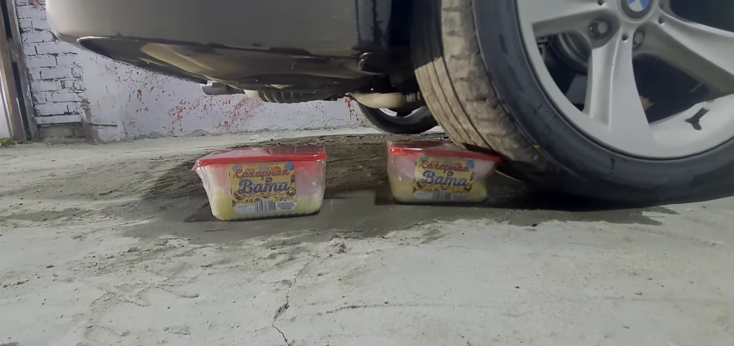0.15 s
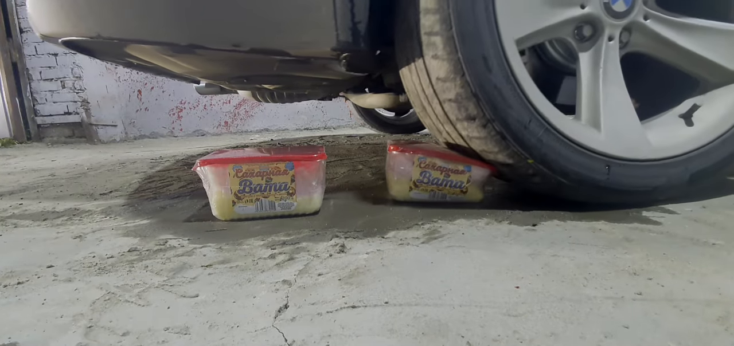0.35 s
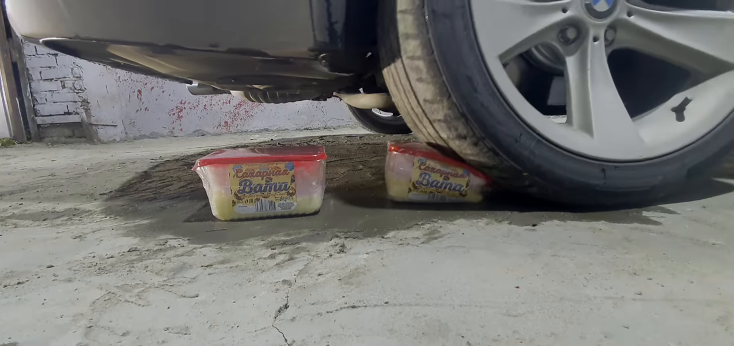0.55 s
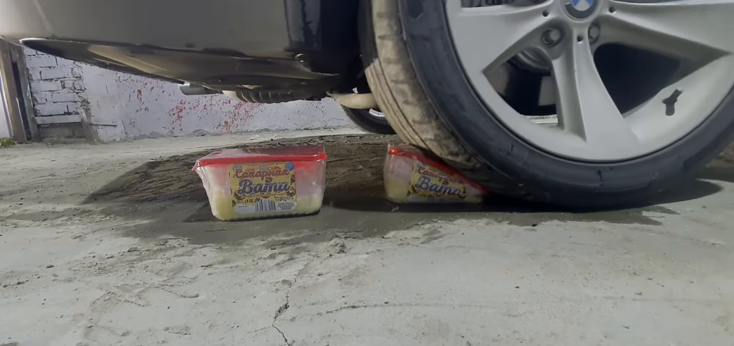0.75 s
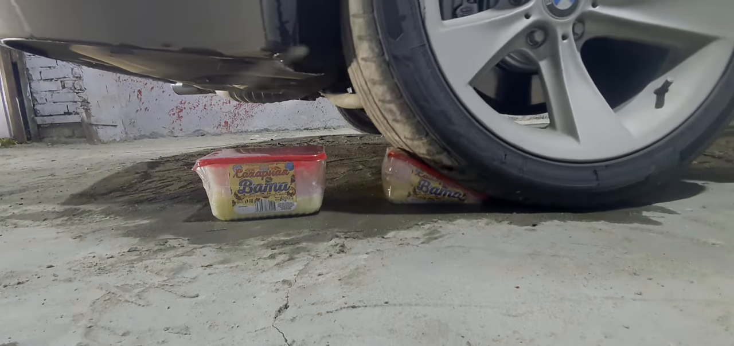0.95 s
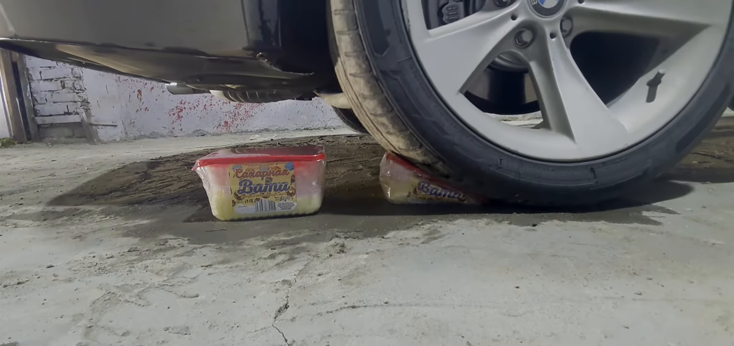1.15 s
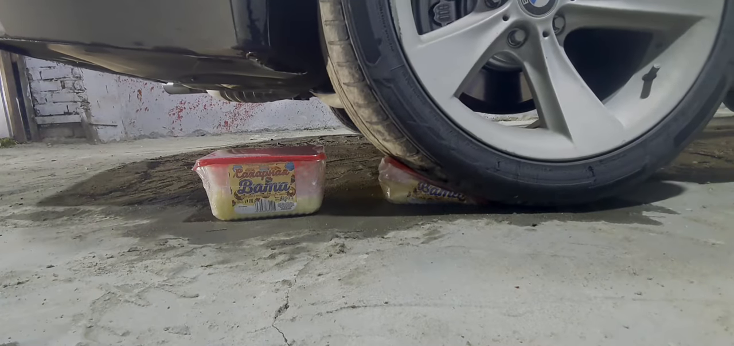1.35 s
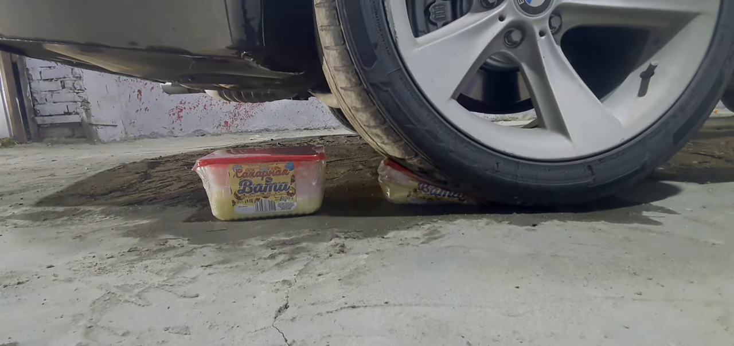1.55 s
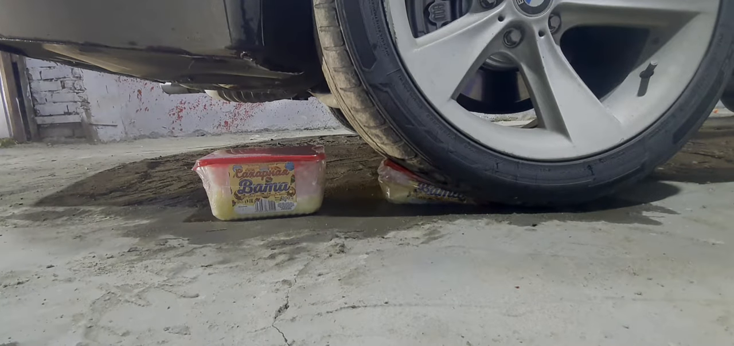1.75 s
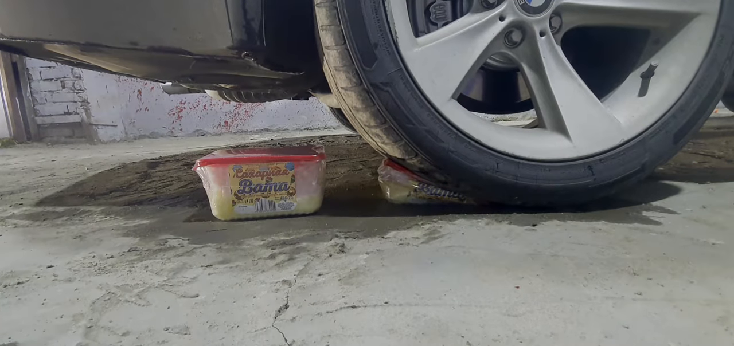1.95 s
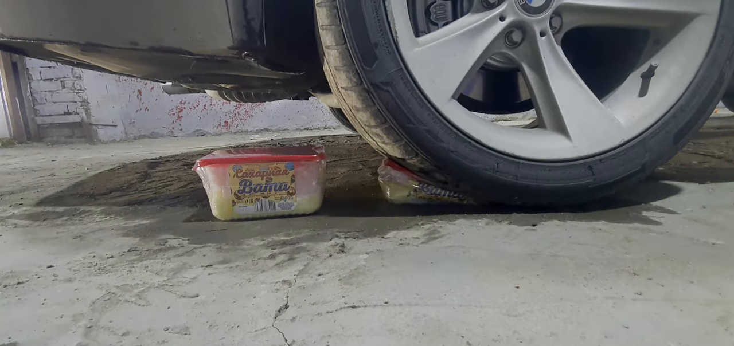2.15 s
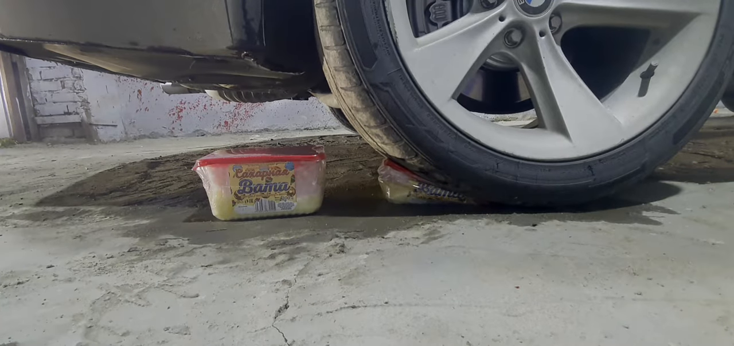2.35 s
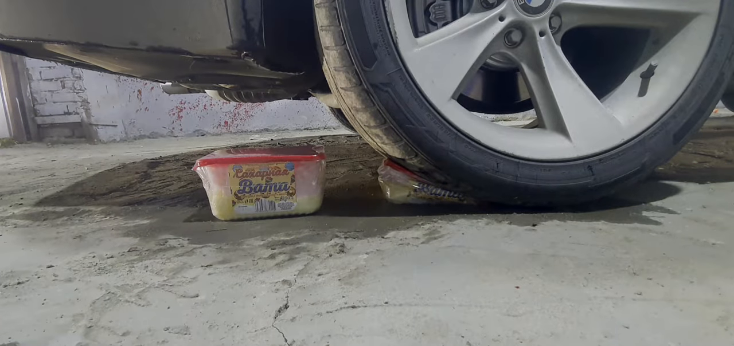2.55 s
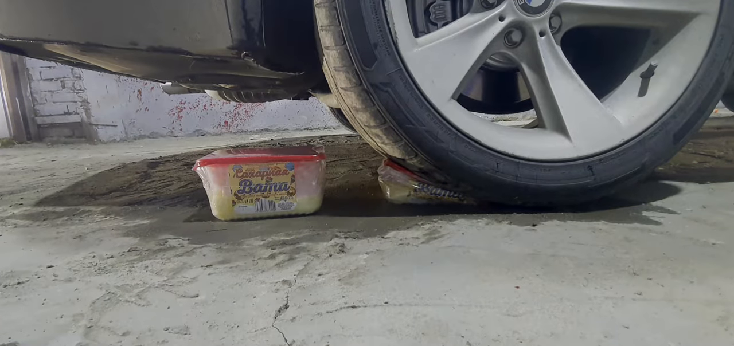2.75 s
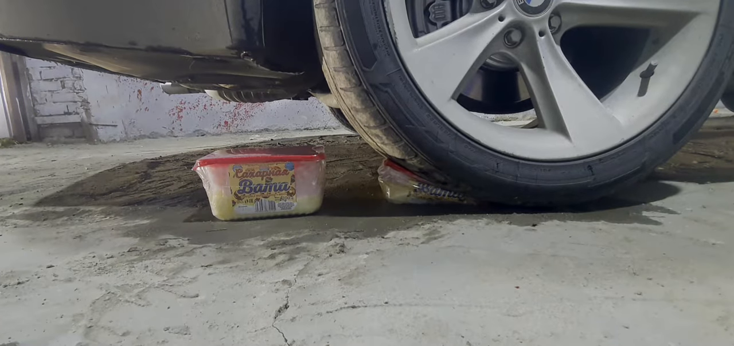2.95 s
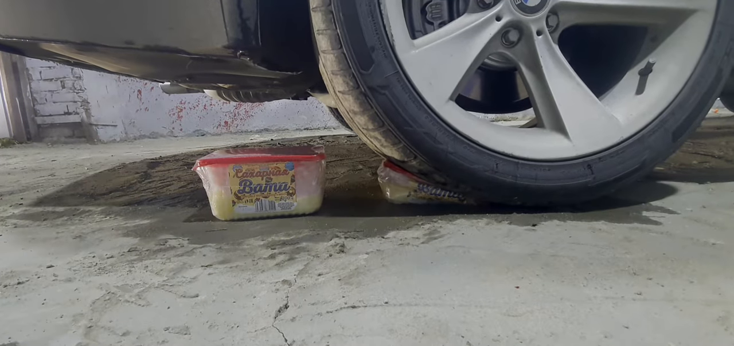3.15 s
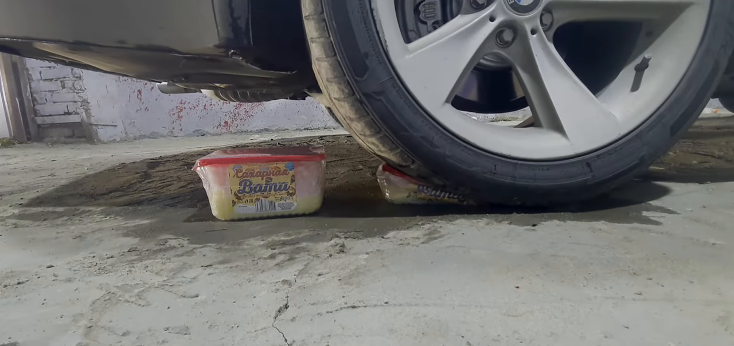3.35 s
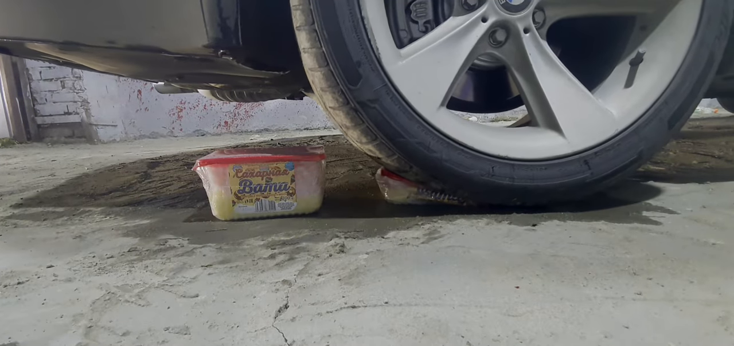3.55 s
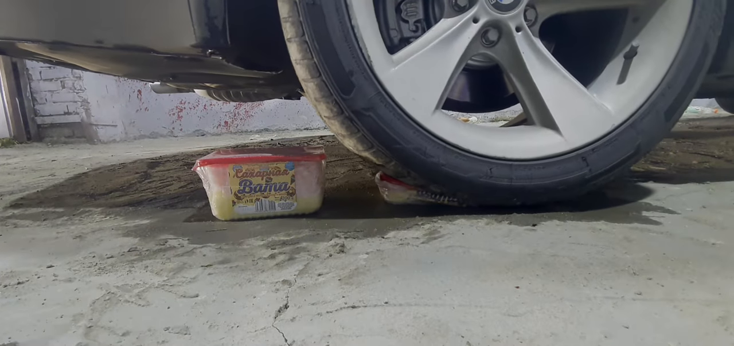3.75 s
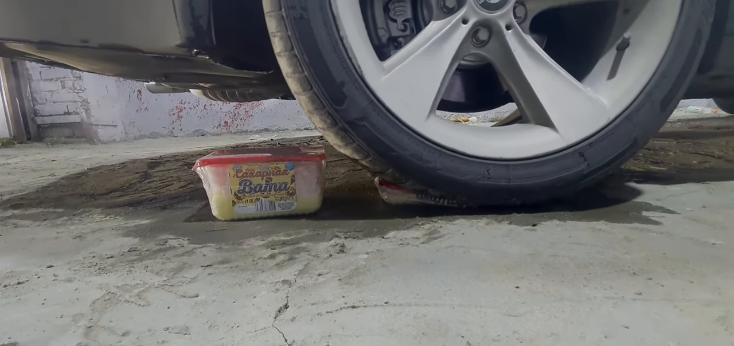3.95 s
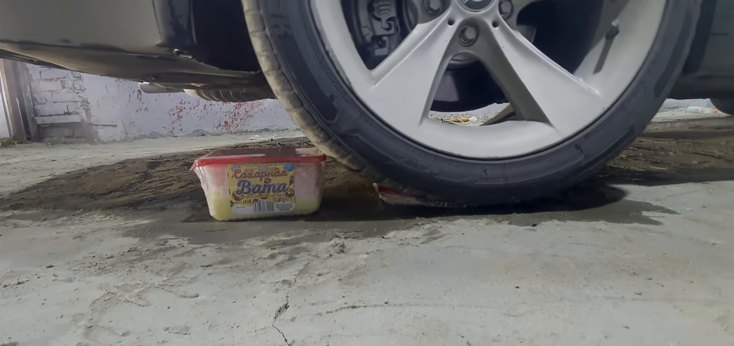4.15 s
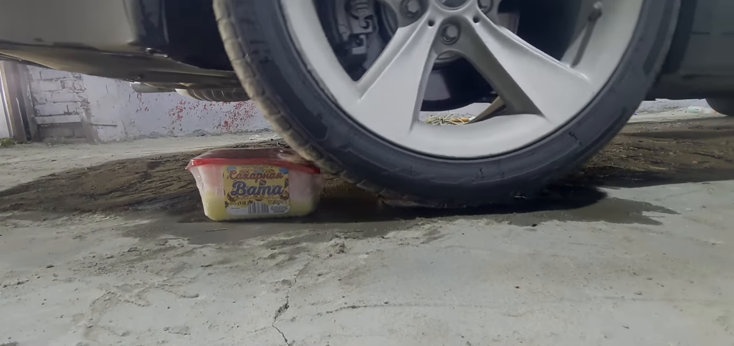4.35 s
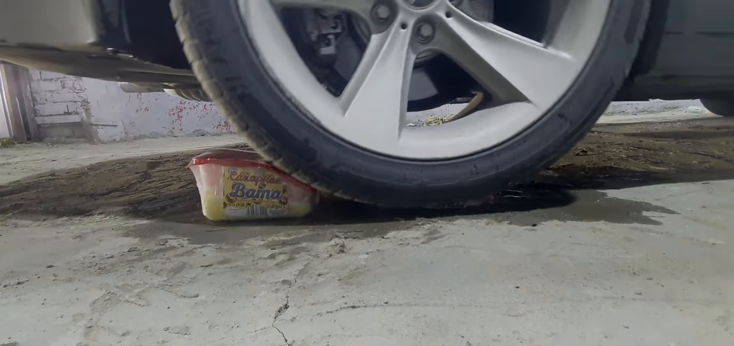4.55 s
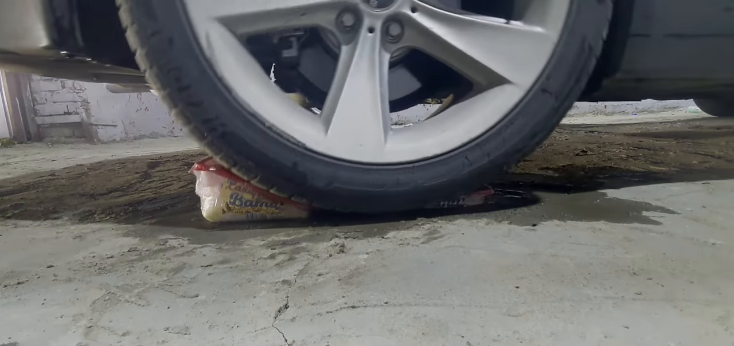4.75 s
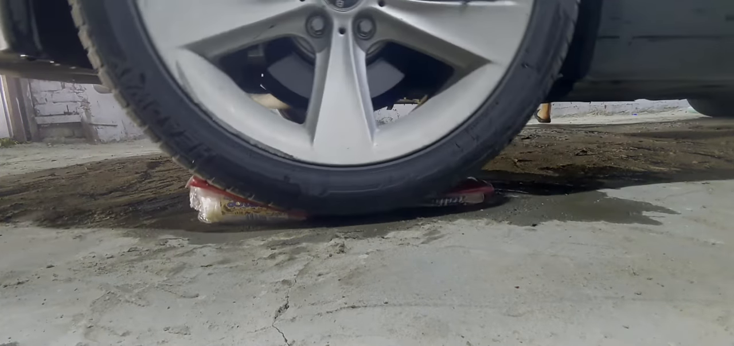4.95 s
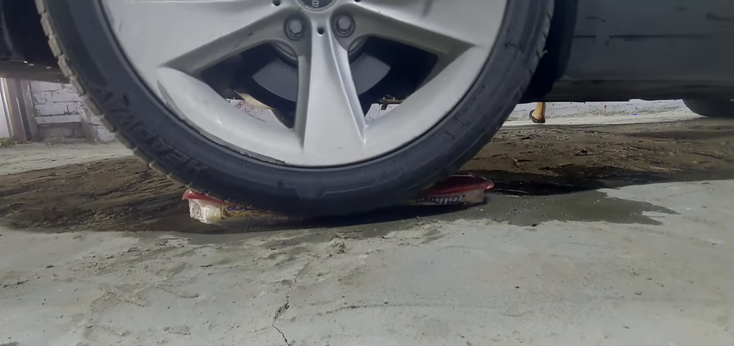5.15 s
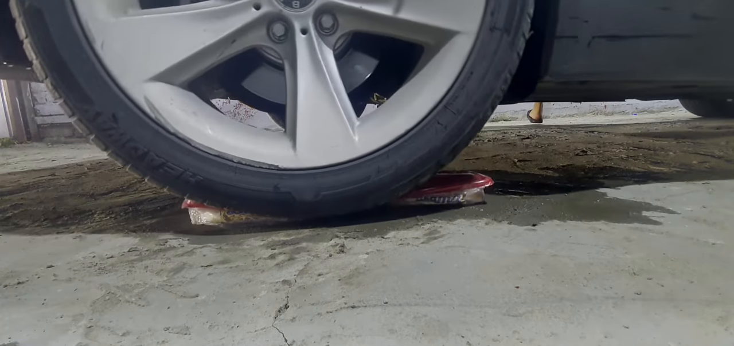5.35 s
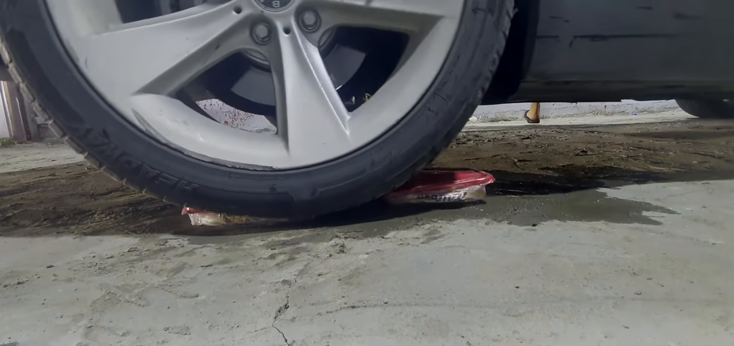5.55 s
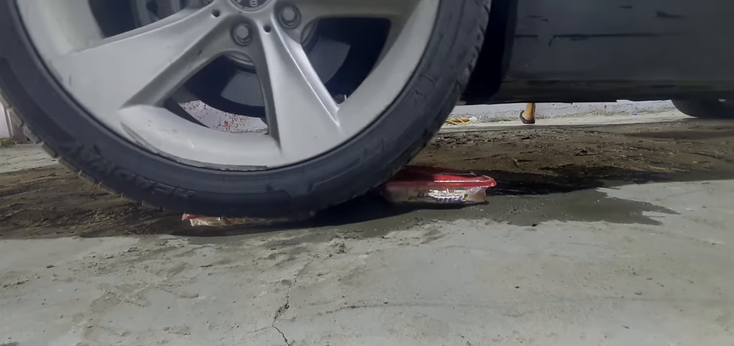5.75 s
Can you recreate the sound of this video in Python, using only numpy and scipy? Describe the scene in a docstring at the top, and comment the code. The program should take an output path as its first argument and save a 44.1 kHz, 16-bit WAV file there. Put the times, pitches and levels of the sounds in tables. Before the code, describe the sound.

A low, throbbing four-cylinder idle runs throughout. Over it, thin plastic buckles at once in hollow pops, snaps and fine crackle, then goes almost quiet as the wheel stalls. The engine picks up slightly with a booming hum, crackling resumes, and a second tub collapses loudly, leaning left, before small ticks trail off. Near, dry and detailed, with short reflections from the car's underside and hard walls.

```python
"""A concrete floor with walls around: a car creeps over two thin plastic tubs, engine just above idle.
The tub walls give dry pops (short damped tones) and cracks (noise bursts) over a fine crackle of tiny grains.
Grit crunches under the tread as bursts of noise, and the crushed plastic gets a short echo.
The four-cylinder engine is a set of tones tied to the crankshaft, plus throbbing noise; it speeds up
briefly to climb the first tub."""
import sys
import numpy as np
from scipy import signal
from scipy.fft import rfft, irfft, next_fast_len
from scipy.io import wavfile
from scipy.ndimage import map_coordinates

SR = 44100
rng = np.random.default_rng(int(sys.argv[2]) if len(sys.argv) > 2 else 0)


def waveform_to_disk(signal):
    """Save audio, clipped to [-1, 1], as 16-bit WAV at the path in sys.argv[1]."""
    frames = np.transpose(np.atleast_2d(signal))
    scaled = np.clip(frames, -1, 1) * 32767
    samples = np.round(scaled).astype(np.int16)
    wavfile.write(sys.argv[1], SR, samples)


N = 255780

# tub walls buckling: t/s, pop level/dB, pop f/Hz, pop decay/cycles, crack level/dB
# (levels here and in the ticks are set before colouring and left-right balance)
BUCKLES = [(0.0396, -2, 670, 0.28, -21.5), (0.065, -5.5, 640, 0.16, -20), (0.0918, -4.5, 630, 0.25, -21),
           (0.0953, -2, 1120, 0.37, -18), (0.1603, -6.5, 1200, .11, -12.5), (0.231, -18.5, 474, .16, -36),
           (0.2792, -10, 880, 0.094, -24), (0.307, -16, 550, 0.2, -23), (0.4062, -14, 1430, .09, -33),
           (0.4734, -13, 570, 0.11, -38), (0.4979, -17.5, 1260, 0.38, -42), (0.554, -13.5, 1710, .34, -35),
           (0.5582, -5, 1900, .18, -16.5), (0.6103, -20, 1920, .15, -11), (0.6249, -7.5, 1470, .21, -11),
           (0.6668, -13, 1470, .16, -14), (0.682, -7, 1690, 0.14, -17), (0.7293, -8.5, 940, 0.24, -34),
           (0.7526, -10, 960, .31, -31), (0.757, -13, 726, 0.49, -24), (0.8322, -15.5, 1850, .3, -20),
           (0.8473, -14, 2020, .46, -18.5), (0.976, -18, 1700, .44, -41), (1.0083, -8, 1610, 0.15, -38),
           (1.0391, -10.5, 1740, .16, -34), (1.0511, -16, 774, 0.44, -33), (1.0872, -17, 1700, 0.15, -43),
           (1.135, -14, 1580, .1, -29), (1.1401, -13, 1800, .1, -27), (1.195, -17.5, 1530, 0.17, -22.5),
           (1.3056, -14, 1710, 0.22, -15), (1.398, -5, 2400, .4, -13.5), (3.2439, -9.5, 1980, .17, -23),
           (3.295, -9.5, 2010, 0.2, -14), (3.3624, -15.5, 1470, .26, -26), (3.5654, -15.5, 1460, .31, -46),
           (3.6388, -10, 1870, 0.2, -14), (4.1626, -10, 750, .11, -21), (4.1873, -7, 1020, 0.31, -14.5),
           (4.2331, -5, 840, .22, -25), (4.2458, -7, 850, 0.16, -20), (4.262, -3, 770, .24, -22),
           (4.2836, -7.5, 1710, .19, -19), (4.3043, -5.5, 830, .13, -12), (4.3151, -13.5, 607, .19, -30),
           (4.3757, -12.5, 970, 0.4, -19), (4.4763, -15.5, 800, 0.24, -26), (4.5042, -10, 497, 0.32, -23),
           (4.5397, -8, 560, 0.26, -25), (4.5824, -15, 766, .4, -31), (4.5956, -4, 810, 0.31, -21),
           (4.6282, -10, 1400, .09, -14.5), (4.6471, -10, 2770, 0.34, -28), (4.6634, -11.5, 1370, .14, -18),
           (4.6807, -10, 820, .24, -23), (4.6899, -10, 725, .31, -20), (4.6986, -12, 1520, .19, -13),
           (4.705, -8.5, 705, .41, -28), (4.741, -11, 1000, 0.24, -30), (4.7511, -16, 1510, .24, -13),
           (4.7755, -15, 970, 0.21, -13.5), (4.8386, -12, 910, 0.31, -31), (4.8798, -14.5, 2240, .11, -24),
           (4.9287, -19, 1340, 0.22, -28), (5.0127, -16, 1820, .27, -46), (5.243, -23, 2250, .1, -29),
           (5.3328, -14.5, 2400, 0.2, -24), (5.5317, -21, 1610, .18, -33), (5.6714, -13.5, 1920, 0.29, -26)]
# plastic splitting without buckling, a high tick: t/s, level/dB, thinness (0-1)
SPLIT_TICKS = [(0.1834, -14.5, .2), (0.2008, -13.5, .3), (0.364, -16.5, .25), (1.171, -15, .55),
               (1.2473, -18.5, .2), (1.507, -22, .15), (1.638, -25.5, .55), (2.3343, -24, .4),
               (3.143, -22.5, .35), (3.23, -20.5, .5), (3.6136, -28, .7), (3.8392, -18, 0),
               (4.058, -21.5, .8), (5.0319, -15.5, .4), (5.0658, -16.5, .05), (5.1302, -19.5, .1),
               (5.358, -19, .9), (5.3913, -22.5, .7)]
# colour of the cracks: f/Hz, level/dB
CRACK_COLOUR = [(2000, -19), (4000, 3), (6000, -0.5), (7800, -3.5), (11000, -1.5), (15500, -6.5),
                (17000, -40)]
# the snaps move towards the left: t/s, left minus right level/dB
SNAP_BALANCE = [(1, -0.7), (4.3, 1), (5.1, 7), (5.6, 0.5)]


def snaps():
    """A buckling wall gives one short pop; where the plastic splits, a sharp crack rides on it or ticks alone."""
    pops, cracks = np.zeros((2, 2, N + SR))
    for s, level_db, thin in SPLIT_TICKS:
        add(cracks, s, amp(level_db) * crack(np.clip(thin, 0, 1)))
    for s, pop_db, hz, life, crack_db in BUCKLES + stray_snaps(count=150):
        add(pops, s, amp(pop_db) * pop(s, hz, life, overtone_db=-5))
        # the less the wall moves, the thinner the crack
        thin = np.clip((crack_db - pop_db + 4.5) / 30, -.25, .9)
        add(cracks, s + 0.00022, amp(crack_db) * crack(thin))

    no_bass = signal.butter(2, 200, 'hp', fs=SR, output='sos')
    pops = signal.sosfilt(no_bass, pops[:, :N])
    cracks = filtered(cracks[:, :N], lambda hz: amp(along(CRACK_COLOUR, hz)))
    sides = np.array([[.5], [-.5]])  # half of each left-right difference to either channel
    cracks = amp(3 + sides * 2.5) * cracks
    balance_db, = curves(SNAP_BALANCE)
    return (pops + cracks) * amp(sides * balance_db)


# which side hears a pop first, tub on the right and then tub on the left: t/s, head start of the left/s
LEFT_LEAD = [(3.7, -.00009), (4.1, .00013)]


def pop(s, hz, life, overtone_db):
    """A patch of wall flips over at time s: a few heavily damped cycles that reach one side first."""
    t = np.arange(SR // 80) / SR
    lead = np.interp(s, *np.transpose(LEFT_LEAD)) + rng.normal(0, .00007)
    cycles = hz * np.maximum(t + np.array([[.5], [-.5]]) * lead, 0)

    def swell(span):
        """Rise quickly and die away, both counted in cycles."""
        return (cycles / span) ** 2 * np.exp(-cycles / span)

    main = swell(life) * np.sin(2 * np.pi * cycles + rng.normal(0, 0.56))
    # a second, higher way for the wall to bend, weaker in high pops
    higher = swell(0.79 * life) * np.sin(2 * np.pi * cycles * rng.uniform(1.82, 3.08))
    higher = amp(overtone_db) / (1 + hz / 1500) * higher
    return burst(main + higher) * rng.choice([-1, 1])


def crack(thin):
    """The plastic splits: a sharp burst of noise; the thinner it is, the more it is all treble."""
    t = np.arange(SR // 80) / SR
    onset = 1 - np.exp(-t / .00005)
    decay = np.exp(-t / 0.00013) + 0.15 * np.exp(-t / 0.0013)
    noise = rng.standard_normal((2, len(t)))
    noise = signal.lfilter([1, -2 * thin, thin ** 2], [1, 0, 0.17 * thin], noise)
    return amp(5.4 * thin) * burst(decay * onset * noise)


STRAY_POP_DB, STRAY_CRACK_DB = 15, 9.5  # the largest strays, above the crumpling level
STRAY_RANGE_DB = 13  # the smallest lie this far below the largest
STRAY_TOP_DB = -33  # harder crumpling makes them no louder
STRAY_CYCLES = 0.18  # decay of their pops


def stray_snaps(count):
    """Small snaps at random moments, closer together where the crumpling is hard, as rows like those of BUCKLES."""
    level_db = crumple_level()
    share = np.cumsum(amp(.5 * level_db))
    rows = []
    for when, pop_size, pitch, crack_size in rng.random((count, 4)):
        i = np.searchsorted(share, when * share[-1])
        db = min(level_db[i], STRAY_TOP_DB)
        pop_db = db + STRAY_POP_DB - STRAY_RANGE_DB * pop_size
        crack_db = db + STRAY_CRACK_DB - STRAY_RANGE_DB * crack_size
        rows.append((i / SR, pop_db, 850 * 4.8 ** pitch, STRAY_CYCLES, crack_db))
    return rows


# colour of the crackle of creasing plastic: f/Hz, level/dB
CREASE_COLOUR = [(150, -47), (350, -8), (750, 2.5), (1500, -1), (3000, -1.5), (7000, -13), (12000, -12.5),
                 (15600, -16), (16500, -44)]


def crumpling():
    """Small creases and buckles run through the plastic while the tyre presses it flat."""
    buckles = np.zeros((2, N + SR))
    for s, pitch, size in rng.random((1500, 3)) * [N / SR, 1, 1]:
        small_pop = pop(s, 550 * 5.8 ** pitch, life=0.27, overtone_db=-3.5)
        add(buckles, s, amp(-30 * size) * small_pop)
    creases = spread(grains(rate=450, scatter_db=5.5, life=.0005, bed_db=-10), CREASE_COLOUR)
    mix = amp(-1.5) * creases + amp(1.0) * unit_rms(buckles[:, :N])
    return amp(crumple_level()) * mix * amp([[.8], [-.8]])


# parts of a tub caving in: t/s, length/s, crumpling level/dB (before the crumpling is mixed)
FOLD_EVENTS = [(0, 0.022, -25.5), (0.088, 0.12, -41), (0.614, 0.18, -28), (3.25, 0.13, -46),
               (4.19, 0.12, -37), (4.64, 0.15, -27)]
FOLD_RISE_S, FOLD_FALL_S = 0.033, 0.097  # time to change by a factor e
CREASE_DB = -5  # between folds the plastic creases on, this far below the grit


def crumple_level():
    """Crumpling in dB: each fold rises, holds and dies away over the creasing under the tread."""
    t = np.arange(N) / SR
    grit_db, = curves(TREAD_LEVEL)
    power = amp(grit_db + CREASE_DB) ** 2
    for s, length, db in FOLD_EVENTS:
        before, after = np.maximum(s - t, 0), np.maximum(t - s - length, 0)
        fade = before / FOLD_RISE_S + after / FOLD_FALL_S
        power = power + (amp(db) * np.exp(-fade)) ** 2
    return 10 * np.log10(power)


# crunch under the tread, hushed while the wheel stalls against the first tub:
# t/s, level/dB (before a small tilt to the left)
TREAD_LEVEL = [(0, -40.5), (1, -35), (1.45, -47.5), (2.4, -70), (2.9, -61), (3.1, -45), (3.3, -39.5),
               (3.7, -42.5), (4.6, -34), (5.25, -40.5), (5.8, -47)]
# colour of the grit: f/Hz, level/dB
GRIT_COLOUR = [(1000, -9), (2500, 2.5), (4000, 3), (6000, 0.5), (7500, -2.5), (10000, -2.5), (15500, -2),
               (16400, -36)]


def tread():
    """Grit and splinters crunch between rubber and concrete: dense bursts of bright noise."""
    grit_db, = curves(TREAD_LEVEL)
    crunch = grains(rate=320, scatter_db=5.5, life=.0006, bed_db=0)
    return amp(grit_db) * spread(crunch, GRIT_COLOUR) * amp([[1.5], [-1.5]])


def engine():
    """The crankshaft drives every tone; the bay's rattle throbs with each firing, two to a turn."""
    speed, = curves(CRANK_SPEED)
    angle = 2 * np.pi * np.cumsum(speed) / SR
    tones = exhaust_boom(speed, angle) + body_hum(speed, angle) + belt_whine(angle)
    sound = (tones + bay_noise(angle)) * amp([[.3], [-.3]])
    # the engine stands off to one side: the right hears it first
    lag = np.array([[.5], [-.5]]) * 0.00029
    return filtered(sound, lambda f: np.exp(-2j * np.pi * f * lag))


# crankshaft speed: t/s, speed/(turns per s)
CRANK_SPEED = [(0, 15.87), (1.8, 15.97), (2.25, 16.14), (2.7, 17.03), (2.97, 18.4), (3.18, 20.28),
               (3.28, 20.2), (3.38, 19.07), (3.48, 18.35), (3.8, 17.7), (4.15, 17.32), (4.6, 16.64),
               (5.1, 16.32), (5.5, 16.5)]


def order_tone(order, angle):
    """A sine of rms 1 that repeats `order` times per crankshaft turn, from a random phase."""
    return np.sqrt(2) * np.sin(order * angle + rng.uniform(0, 2 * np.pi))


# boom tones: cycles per crankshaft turn
BOOM_MULTIPLES = (2, 3, 4, 6, 7)
# strength of each boom tone before load and exhaust: level/dB
BOOM_STRENGTH = [-23.5, -26.5, -23, -25.5, -29.5]
# how much each boom tone gains with load: dB per dB
BOOM_LOAD_GAIN = [1.8, 0.9, 1, 1.4, 1]
# engine load, greatest on the climb: t/s, level/dB (before the gain above)
ENGINE_LOAD = [(0, -3), (1.2, -1), (2.3, -1), (2.85, 1.7), (3.55, 2), (4.15, 1), (4.4, -4.5), (4.8, -8),
               (5.1, -6.5), (5.8, -6.5)]
# exhaust resonances: f/Hz, width/Hz, level/dB
EXHAUST_PEAKS = [(67.3, 8.5, -1), (110.03, 7.2, -0.5)]
# exhaust between its resonances: f/Hz, level/dB
EXHAUST_BASE = [(35, -12), (50, -10), (55, -11), (60, -16), (76, -30), (100, -34), (140, -15)]


def exhaust_boom(speed, angle):
    """The exhaust booms when a multiple of the crankshaft speed crosses one of its resonances."""
    load_db, = curves(ENGINE_LOAD)
    hz = np.arange(SR // 20)
    exhaust = amp(along(EXHAUST_BASE, hz)) + resonances(EXHAUST_PEAKS, hz)
    boom = 0
    for order, db, growth in zip(BOOM_MULTIPLES, BOOM_STRENGTH, BOOM_LOAD_GAIN):
        level = amp(db + growth * load_db + 0.83 * wobble(12))
        boom = boom + level * np.interp(order * speed, hz, exhaust) * order_tone(order, angle)
    return boom


# weaker engine tones: cycles per crankshaft turn
HUM_MULTIPLES = (8, 8.8, 10, 11.3, 12, 14, 16, 17.7, 18, 20, 22, 24, 26, 30)
# their strength before the car body and the fade with the bay: level/dB
HUM_STRENGTH = [-47.5, -48, -46.5, -50, -46, -46.5, -47, -52.5, -48, -52.5, -53.5, -49.5, -56.5, -56.5]
# resonances of the car that lift these tones: f/Hz, width/Hz, level/dB (before a common cut)
BODY_PEAKS = [(140, 16, 2.5), (196, 22, -1), (287.2, 21.6, 1), (365, 16, -12), (464, 97, 1),
              (820, 123, 8.5)]


def body_hum(speed, angle):
    """Weaker multiples of the crankshaft speed sound through the body's resonances."""
    hz = np.arange(SR // 20)
    body = amp(-14.0) + amp(-3) * resonances(BODY_PEAKS, hz)
    hum = 0
    for order, db in zip(HUM_MULTIPLES, HUM_STRENGTH):
        level = amp(db + 1.84 * wobble(9))
        hum = hum + level * np.interp(order * speed, hz, body) * order_tone(order, angle)
    bay_db, = curves(BAY_NEARNESS)
    return hum * amp(1.24 * (bay_db - np.median(bay_db)))  # it fades as the bay moves past


# belt-driven parts: t/s, hum level/dB, whine level/dB (before a slow wobble)
BELT_LEVEL = [(0, -54, -67), (1.2, -45.5, -60), (2.3, -46.5, -50), (2.6, -56, -50), (5.15, -54.5, -68),
              (5.5, -52, -48), (5.8, -57, -46)]
# hum and whine: cycles per crankshaft turn
BELT_MULTIPLES = (22.7, 49)


def belt_whine(angle):
    """Parts driven by the belt hum and whine at fixed ratios to the crankshaft."""
    return sum(amp(db + 1.0 * wobble(4.0)) * order_tone(order, angle)
               for order, db in zip(BELT_MULTIPLES, curves(BELT_LEVEL)))


# the engine bay comes near and moves past: t/s, level/dB of its rattle (before the throb)
BAY_NEARNESS = [(0, -36), (1, -38), (2, -38), (3.15, -33.5), (4.4, -37), (5.3, -44.5), (5.5, -40.5),
                (5.8, -39.5)]
# colour of the engine bay's rattle: f/Hz, level/dB
BAY_COLOUR = [(76, -51), (130, -10), (200, -17.5), (300, -13.5), (540, -19.5), (820, -16), (1080, -18.5),
              (1850, -15.5), (2900, -24.5), (3700, -30), (6500, -34), (7700, -40.5), (9500, -36.5),
              (15500, -42), (16400, -65)]


def bay_noise(angle):
    """Rattle is coloured noise that throbs with the firing; rumble is steady-textured low noise beneath."""
    bay_db, = curves(BAY_NEARNESS)
    throb = amp(0.54 * np.sin(2 * angle))
    rattle = amp(bay_db) * throb * spread(rng.standard_normal((2, N)), BAY_COLOUR)
    low = [(12, -20), (30, 10), (110, 16.0), (180, -23), (300, -37.0)]  # f/Hz, level/dB
    rumble = amp(bay_db - 6.5) * spread(rng.standard_normal((2, N)), low)
    return rattle + rumble


# how long the walls ring: f/Hz, time to fall by 60 dB/s
WALL_DECAY = [(200, 0.45), (800, 0.26), (2200, 0.11), (5000, 0.18), (14000, 0.085)]


def echoes(x, tail_db, underbody_db, underbody_delay):
    """The car's underbody answers first, then the walls; the answer changes as the tyre moves on."""
    out = np.zeros((2, N + SR))
    step = SR // 8  # a new random answer for each stretch of sound
    for start in range(0, N, step):
        # one shared and two separate noises, mixed to be alike in the bass
        hz, t, z = signal.stft(rng.standard_normal((3, SR // 4)), SR, nperseg=256)
        alike = np.clip(along(LIKENESS, hz), 0, 1)[:, None]
        z = np.sqrt(alike) * z[2] + np.sqrt(1 - alike) * z[:2]
        decay = amp(-60 * t / along(WALL_DECAY, hz)[:, None])
        tail = signal.istft(z * decay, SR, nperseg=256)[1]

        t = np.arange(tail.shape[1]) / SR
        early = np.exp(-t / 0.0038) + np.exp(-((t - underbody_delay) / 0.00055) ** 2)
        tail *= (t > .001) * (1 + amp(underbody_db) * early) / np.linalg.norm(tail[0])
        wet = signal.fftconvolve(x[:, start:start + step], tail, axes=1)
        out[:, start:start + wet.shape[1]] += wet
    return amp(tail_db) * out[:, :N]


def amp(db):
    """Decibels to gain."""
    return 10 ** (np.asarray(db) / 20)


def unit_rms(x):
    """Scale to rms 1."""
    return x / np.sqrt(np.mean(x ** 2) + 1e-20)


def along(points, hz):
    """Read (f/Hz, value) points on a log frequency axis."""
    f, v = np.transpose(points)
    return np.interp(np.log(hz + 1), np.log(f + 1), v)


def curves(rows):
    """One value per sample for each column after the time."""
    s, *cols = np.transpose(rows)
    return [np.interp(np.arange(N) / SR, s, c) for c in cols]


def wobble(rate):
    """A smooth random curve, rate knots a second."""
    knots = rng.standard_normal(int(N * rate / SR) + 4)
    return map_coordinates(knots, [np.arange(N) * rate / SR])


def filtered(x, response):
    """x times a response of frequency."""
    m = next_fast_len(N + SR // 2)
    return irfft(rfft(x, m) * response(np.fft.rfftfreq(m, 1 / SR)), m)[..., :N]


def resonances(table, hz):
    """Gain of a set of resonances: f/Hz, width/Hz, level/dB."""
    return sum(amp(db) / (1 + (2 * (hz - fc) / width) ** 2) for fc, width, db in table)


# how alike left and right are: f/Hz, likeness (0-1)
LIKENESS = [(100, 1), (500, 0.97), (1500, 0.3), (4000, 0.13), (12000, 0.05)]


def spread(pair, spectrum):
    """Colour two unrelated signals and mix them to stereo of rms 1, alike in the bass."""
    def mid_side_gain(hz):
        """Share the colour between middle and sides."""
        turn = np.arccos(np.clip(along(LIKENESS, hz), -1, 1)) / 2
        return amp(along(spectrum, hz)) * np.array([np.cos(turn), np.sin(turn)])

    mid, side = filtered(pair, mid_side_gain)
    return unit_rms(np.array([mid + side, mid - side]))


def grains(rate, scatter_db, life, bed_db):
    """Noise in tiny bursts of uneven size, on a smooth bed of countless smaller ones."""
    starts = rng.random(N) < rate / SR  # about `rate` bursts a second
    sizes = starts * amp(scatter_db * np.minimum(rng.exponential(size=N), 3))
    power = signal.lfilter([1], [1, -np.exp(-2 / (life * SR))], sizes ** 2)
    return np.sqrt(power / power.mean() + amp(bed_db) ** 2) * rng.standard_normal((2, N))


def burst(x):
    """Give a short sound the energy of one millisecond at rms 1."""
    return x * np.sqrt(SR / 1000 / np.mean(np.sum(x ** 2, -1)))


def add(track, s, sound):
    """Mix a sound into the track at time s."""
    start = max(round(s * SR), 0)
    track[:, start:start + sound.shape[1]] += sound


def scene():
    """The tubs close by with their echoes, the tread, and the engine behind."""
    crush = snaps() + crumpling()
    crush_echoes = echoes(crush, tail_db=-12, underbody_db=3.5, underbody_delay=0.008)
    return crush + crush_echoes + tread() + engine()


TOP_HZ = 16800  # band limit


def record(dry):
    """The loudest peaks are rounded off, and nothing passes above the band limit."""
    rounded = dry / (1 + np.abs(dry) ** 6) ** (1 / 6)
    return filtered(rounded, lambda hz: hz < TOP_HZ)


dry = scene()
out = record(dry)
waveform_to_disk(out)
```